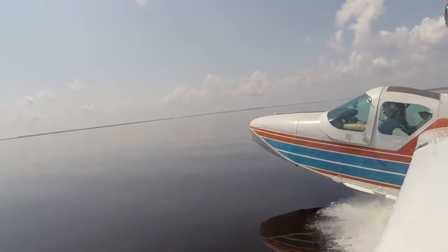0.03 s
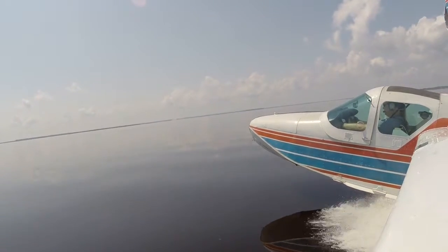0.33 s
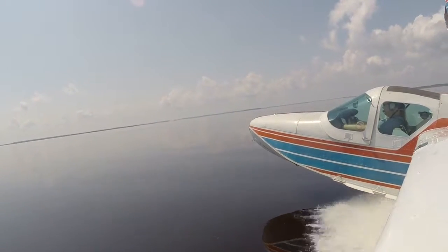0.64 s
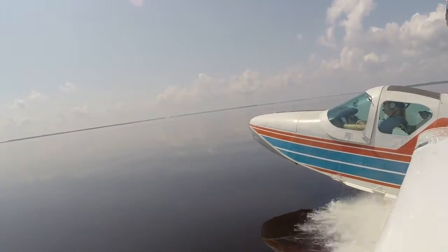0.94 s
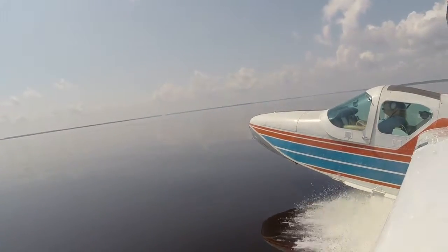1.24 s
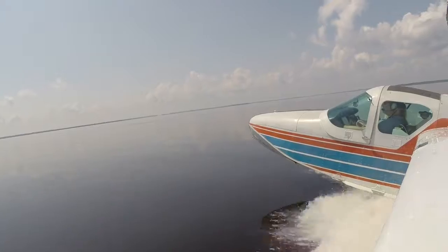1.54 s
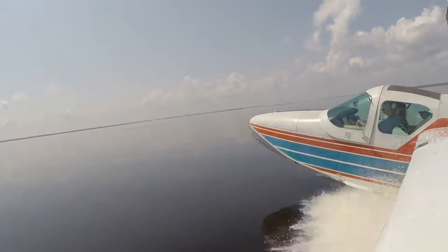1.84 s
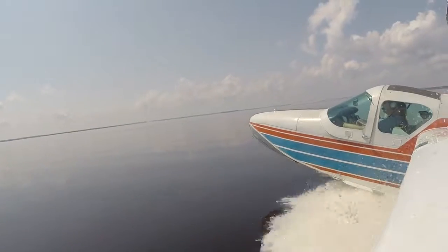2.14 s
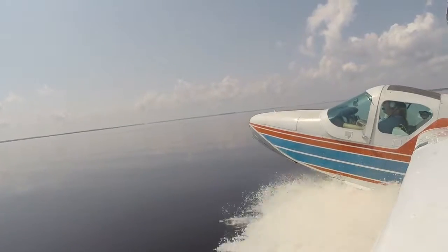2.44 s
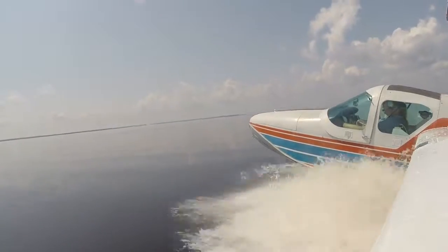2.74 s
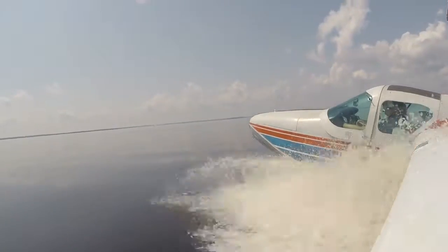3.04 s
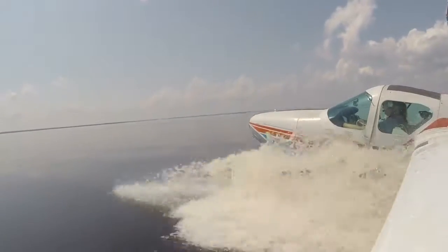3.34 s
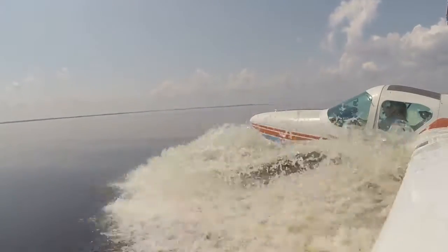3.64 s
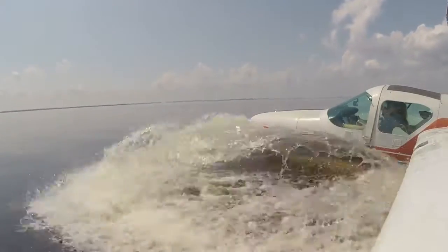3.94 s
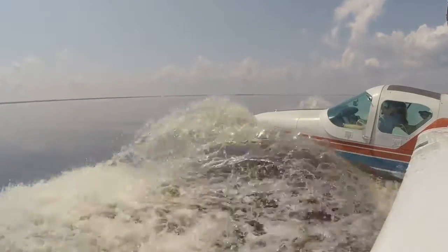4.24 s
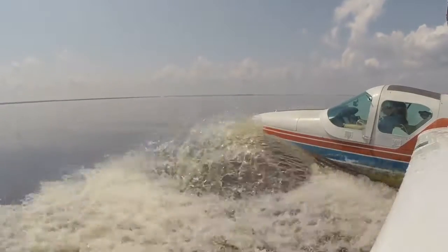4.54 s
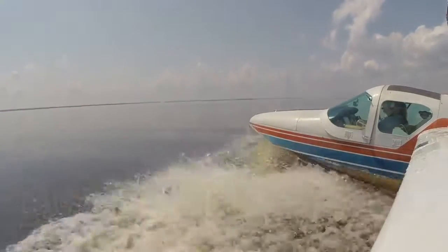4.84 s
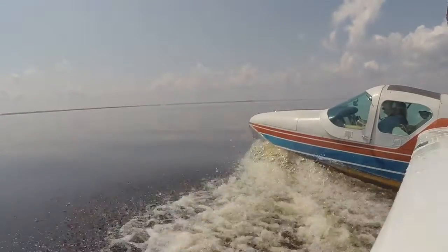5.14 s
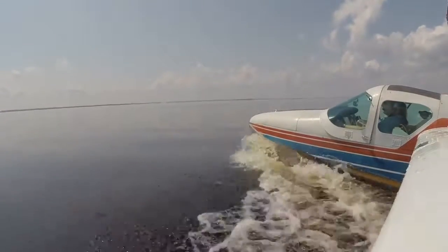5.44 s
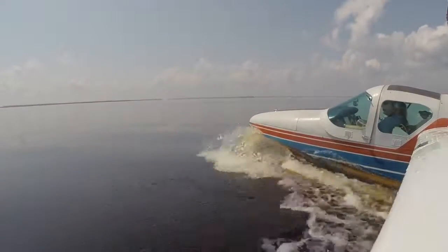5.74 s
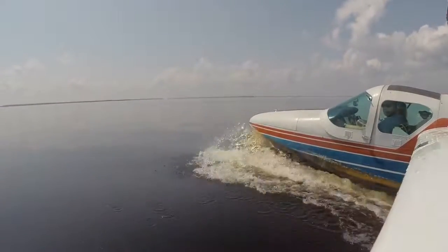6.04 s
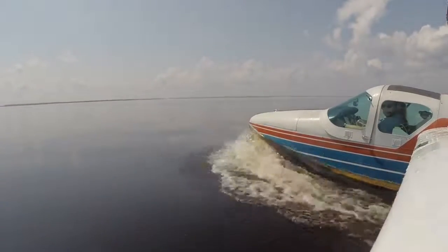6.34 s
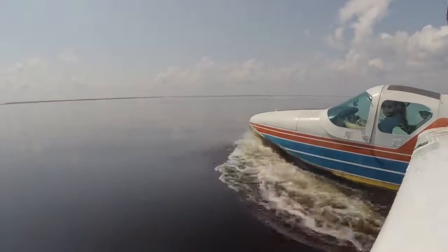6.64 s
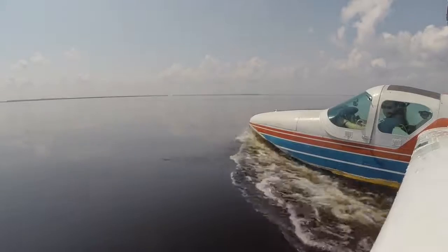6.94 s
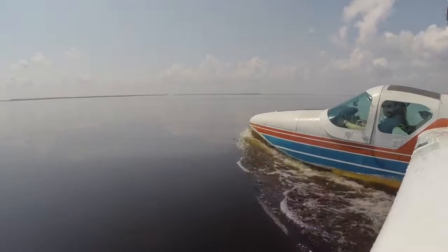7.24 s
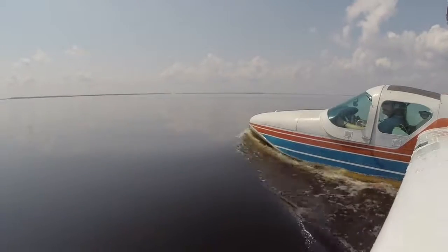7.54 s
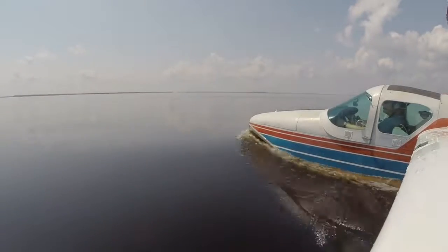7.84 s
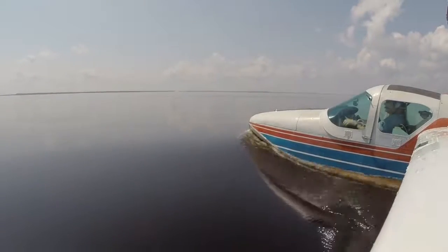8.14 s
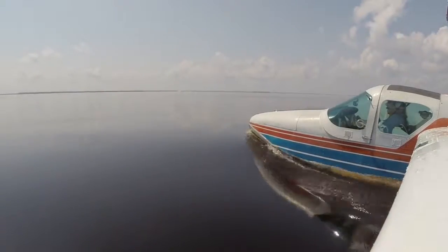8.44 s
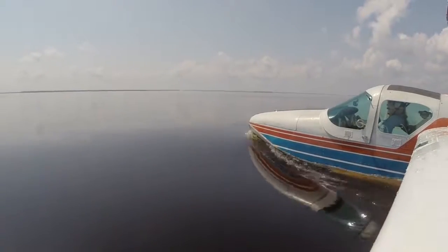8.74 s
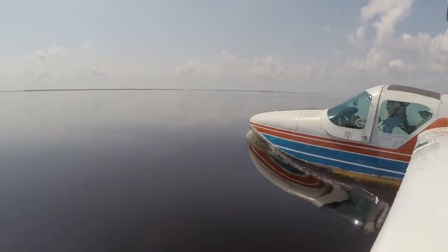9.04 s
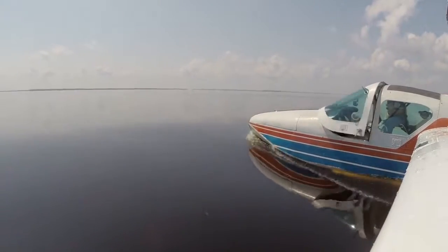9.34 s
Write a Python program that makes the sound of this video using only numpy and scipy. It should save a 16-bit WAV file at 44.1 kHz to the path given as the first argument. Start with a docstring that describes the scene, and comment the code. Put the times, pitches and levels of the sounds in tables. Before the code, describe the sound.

A small seaplane rumbles and hisses across water, spray washing up, then drifts with its engine idling, a part ticking and wavelets knocking.

```python
"""The airframe of a small flying boat rumbles as it skims onto calm water, ploughs to a stop and drifts.
Water pounding the hull drives the resonances of wing, panels and cavity; the keel hisses, the bow throws
spray, and wavelets knock on the floating hull. The engine hums at idle and a loose part ticks with it.
All is heard from a camera in a closed housing on the wing. Drops strike the housing and make it ring;
each hard one ducks the camera's gain, which then creeps back up."""
import sys
import numpy as np
from scipy import signal
from scipy.fft import rfft, irfft, next_fast_len
from scipy.io import wavfile
from scipy.ndimage import uniform_filter1d, minimum_filter1d, map_coordinates

SR = 44100
rng = np.random.default_rng(int(sys.argv[2]) if len(sys.argv) > 2 else 0)


def wav_out(sig):
    """Save sig, one row per channel (or a flat mono array), as 16-bit PCM at SR to the path in sys.argv[1]."""
    wavfile.write(sys.argv[1], SR, np.round(np.clip(np.atleast_2d(sig).T, -1, 1) * 32767).astype(np.int16))


N = 418068

# water pounding the hull, hard while it planes, light once it floats: (time [s], level [dB])
HULL_LOAD = [(0, -16), (.4, -19), (.7, -14.5), (1.0, -11), (1.6, -13.5), (3.1, -15), (3.55, -23.5),
             (4.5, -25), (7.8, -26.5), (9.48, -27)]
# waves passing under the floating hull: (time [s], length [s], wing boost [dB])
SWELLS = [(3.818, .2, 5), (5.58, 0.22, 6.5), (6.77, 0.35, 6.5), (7.3, 0.1, 7.5), (8.74, 0.17, 5.5)]
# airframe and airflow spectra: (frequency [Hz], relative level [dB])
WING_SPECTRUM = [(85, -20), (112, -14.5), (130, -5.5), (143, 0.5), (156, -6), (180, -11), (205, -22.5)]
PANEL_SPECTRUM = [(160, -12), (205, -2), (230, -1.5), (247, -1.5), (285, 1), (310, -11), (340, -19),
                  (367, -11), (385, -20.5), (460, -27)]
CAVITY_SPECTRUM = [(480, -21), (620, 2), (740, 2.5), (815, -11.5), (890, 4), (1000, -16)]
SLIPSTREAM_SPECTRUM = [(25, 9), (34, -13.5), (50, 0.5), (70, -2.5), (95, 1), (130, -3)]
# drops on the housing: (time [s], snap peak [dB], splat level [dB])
DROPS = [(.4235, 4, -8), (.7203, 14.5, -8), (.8635, 3, -14), (1.006, -1, -19), (1.034, 3, -4),
         (1.2, 5, -12), (1.2215, -3, -15), (1.2545, 1, -7), (2.1898, 12.5, -16), (2.5295, -1, -9.5)]
# the housing's modes: (frequency [Hz], relative level [dB], t60 [s])
HOUSING_MODES = [(698, -15.5, 0.05), (1200, -5, 0.046), (1783, -4, 0.04), (1990, 1, 0.015),
                 (2296, 4.5, 0.019), (2475, 14.5, 0.0088), (3140, -2, 0.013)]
# engine harmonics: (multiple of the pulse rate, mean level [dB])
HUM_HARMONICS = [(1, -31.5), (2, -43), (3, -61.5), (4, -56), (5, -56.5), (6, -63), (8, -59.5)]
# engine noise spectra: (frequency [Hz], relative level [dB])
MACHINERY_SPECTRUM = [(400, -0.5), (520, -10), (630, -4.5), (750, -3.5), (815, -5), (880, 3), (970, -5),
                      (1080, -12.5), (1230, -2), (1620, -9.5), (1880, -3), (2700, -7), (3600, -14),
                      (5100, -23), (8500, -44), (14500, -54.5)]
WHINE_SPECTRUM = [(1950, -23), (2120, 12), (2200, 13), (2420, -15)]
# hiss of the planing keel: (time [s], level [dB])
KEEL_LEVEL = [(0, -19), (.2, -19.5), (.4, -17), (.5, -22.5), (1.1, -24.5), (1.95, -30), (2.25, -44.5),
              (2.8, -42.5)]
# water thrown up by the bow: (time [s], level [dB])
SPRAY_LEVEL = [(1.5, -45.5), (2.3, -38), (3.25, -35.5), (3.7, -37), (4.5, -35.5), (5.55, -47),
               (6.15, -43.5), (6.7, -51), (8, -65)]
# the rattle's cycle, lengthening as the engine settles: (time [s], period [s])
RATTLE_PERIOD = [(2.7, .2196), (5.3, .2381), (6.2, .2324), (7.9, .2347), (9.0, .2279)]
# contacts in each cycle: (phase [cycles], level re the main tick [dB])
CONTACTS = [(0, 0), (.25, -23), (.75, -11.5)]
# the loose part's modes: (frequency [Hz], width [Hz], relative level [dB])
RATTLE_MODES = [(1900, 280, 8), (2550, 400, -3), (3290, 480, 9.5), (4400, 500, -8), (5720, 560, 1.5),
                (7080, 340, -1.5), (8000, 1000, -6.5), (8850, 400, -13.5), (10600, 1000, -23),
                (12700, 1100, -25)]
# the strongest wavelets on the hull: (time [s], excitation level [dB])
SLAPS = [(5.965, -31), (6.43, -31), (6.868, -25.5), (6.897, -28.5), (7.138, -33), (7.332, -28.5),
         (7.597, -34), (8.036, -28), (8.498, -28), (8.992, -32)]
# spectra of the water sounds: (frequency [Hz], relative level [dB])
SPLAT_SPECTRUM = [(80, -2), (150, 7), (430, -12), (690, 3), (950, -10), (1800, -6), (2250, 1), (3000, -13),
                  (4200, -29), (8000, -45)]
KEEL_SPECTRUM = [(600, -23.5), (950, -10), (1230, 8.5), (1450, -3.5), (1800, -1.5), (2050, -6.5),
                 (3200, -0.5), (3700, -6.5), (4200, -16.5), (5100, -17), (5600, -16), (6200, -26.5),
                 (7000, -22), (7700, -32.5), (11000, -40), (15000, -58)]
WASH_SPECTRUM = [(400, -6), (700, -3.5), (1050, -3), (1800, 0.5), (2250, 6.5), (2800, -1), (3500, 0.5),
                 (4050, -6), (4500, -2), (5100, -13.5), (5650, -7.5), (7500, -21)]
MIST_SPECTRUM = [(6200, 4), (7400, 1), (8550, 8.5), (10000, -1.5), (13000, -6), (15000, -12.5)]
SLOSH_SPECTRUM = [(700, -16), (1300, -5), (1850, -2), (2600, -0.5), (3500, -6), (5000, -20.5), (8500, -27)]
KNOCK_SPECTRUM = [(90, -9), (150, 7.5), (230, -10.5), (350, -6.5), (520, -1), (620, 1), (740, 8.5),
                  (815, -11), (900, 2), (1150, -9.5), (2300, -14.5), (4000, -39)]


def airframe(boom_db=-1.25, panel_db=-9, cavity_db=-26.5, air_db=-36.0, air_speed_db=7.5, stop_s=4.9):
    """Forced vibration: one water load drives wing, panels and cavity; air rumble eases as speed falls."""
    t, load_db = seconds(), curve(HULL_LOAD)
    swell_db = sum(db * np.exp(-(2 * (t - s) / length) ** 2) for s, length, db in SWELLS)
    speed = np.clip(1 - t / stop_s, 0, 1)
    wing = amp(boom_db + swell_db) * drone(WING_SPECTRUM, hold_s=0.15)
    panels = amp(panel_db) * drone(PANEL_SPECTRUM, hold_s=0.5)
    pounding = unit(noise() + grains(rate=70, spread_db=15.0))
    cavity = amp(cavity_db) * coloured(pounding, CAVITY_SPECTRUM)
    air = amp(air_db + air_speed_db * speed) * coloured(noise(), SLIPSTREAM_SPECTRUM)
    return amp(load_db) * (wing + panels + cavity) + air


def drops(attack_s=0.00036, crack_db=-42):
    """Impact excitation: each drop rings the housing's damped modes, then spreads in a wet splat."""
    snaps, t = np.zeros(N), np.arange(SR // 10) / SR
    ring = sum(amp(db - 60 * t / t60) * np.sin(2 * np.pi * hz * t) for hz, db, t60 in HOUSING_MODES)
    ring *= 1 - np.exp(-(t / attack_s) ** 2)  # water makes a soft contact
    for s, db, _ in DROPS:
        add(snaps, s, amp(db) * ring / np.abs(ring).max())
    crack = bursts([(s, db + crack_db) for s, db, _ in DROPS], rise_s=.0002, t60=.007)
    splat = bursts([(s, db) for s, _, db in DROPS], rise_s=.002, t60=.09)
    return snaps + crack + coloured(splat, SPLAT_SPECTRUM)


def engine(pulse_hz=122.74, low_throb_hz=34, low_throb_db=-38.5, machinery_db=-44.5, whine_db=-45.5,
           throb_depth=0.12):
    """Periodic pulses give a harmonic hum; a deep, wavering throb pulses machine noise under a whine."""
    clock = np.cumsum(1 + 0.002966 * wobble(1.5) + 0.00618 * wobble(17)) / SR  # the speed wavers
    hum = sum(amp(db + 3.3 * wobble(3.7)) * np.sin(2 * np.pi * order * pulse_hz * clock)
              for order, db in HUM_HARMONICS)
    low_throb = np.sin(2 * np.pi * low_throb_hz * clock + 0.87 * wobble(7))
    tones = np.sqrt(2) * (hum + amp(low_throb_db + 7.1 * wobble(7)) * low_throb)
    machinery = amp(machinery_db) * coloured(noise(), MACHINERY_SPECTRUM) * (1 + throb_depth * low_throb)
    whine = amp(whine_db) * drone(WHINE_SPECTRUM, hold_s=0.085)
    return tones + machinery + whine


def keel_hiss(flutter_db=-0.72, fade_db_per_s=40):
    """Shear noise: the keel cuts the surface with a hiss that dies as the hull comes off the step."""
    off_step_s = np.maximum(seconds() - KEEL_LEVEL[-1][0], 0)
    level_db = curve(KEEL_LEVEL) - fade_db_per_s * off_step_s + flutter_db * wobble(26.1)
    return amp(level_db) * coloured(patchy(noise(), depth_db=1.0), KEEL_SPECTRUM)


def spray(mist_db=-57, mist_exponent=1.37, reference_db=-38, fizz_db=-76, droplets=0.36):
    """Random impacts: bow spray rains back as a wash; mist follows a power law, over a steady fizz."""
    spray_db = curve(SPRAY_LEVEL)
    water = unit(noise() + droplets * grains(rate=500, spread_db=24))
    wash = amp(spray_db + 0.73 * wobble(13)) * coloured(patchy(water, depth_db=1.5), WASH_SPECTRUM)
    mist = amp(mist_db + mist_exponent * (spray_db - reference_db))
    return wash + np.hypot(mist, amp(fizz_db)) * coloured(noise(), MIST_SPECTRUM)


def rattle(tick_db=-30.5, growth_db_per_s=.42, scatter_db=1.0, rub_db=-15, reference_tick_s=2.3665):
    """Intermittent contact: a loose part rocks with the engine, in cycles of tick, rebound, rub, rebound."""
    t = seconds()
    turns = np.cumsum(1 / curve(RATTLE_PERIOD)) / SR
    turns -= np.interp(reference_tick_s, t, turns)
    cycles = np.arange(int(turns[-1]) + 1)  # the first tick falls at reference_tick_s
    times_at = lambda phase: np.interp(cycles + phase, turns, t)
    level_db = tick_db + growth_db_per_s * (times_at(0) - reference_tick_s)
    level_db += scatter_db * rng.standard_normal(len(cycles))
    contacts = np.vstack([np.c_[times_at(phase), level_db + db] for phase, db in CONTACTS])
    resonances = lambda f: unit(sum(amp(db) * (1j * f * width / (hz * hz - f * f + 1j * f * width)) ** 2
                                    for hz, width, db in RATTLE_MODES))
    ticks = filtered(bursts(contacts, rise_s=.0042, t60=.03), resonances)
    rubs = bursts(np.c_[times_at(.5), level_db + rub_db], rise_s=0.0087, t60=0.16)
    return ticks + coloured(rubs, SLOSH_SPECTRUM)


def lapping(ripple_db=-49, slosh_db=-51, slosh_swing_db=7):
    """Cavity resonance: wavelets and ripples knock on the hollow hull, with sloshes between them."""
    knocks = bursts(SLAPS, rise_s=.003, t60=.04)
    ripples = amp(ripple_db) * grains(rate=30, spread_db=18.5)
    surge = amp(slosh_swing_db * np.clip(wobble(24), -2, 2))
    sloshes = amp(slosh_db) * unit(surge * coloured(noise(), SLOSH_SPECTRUM))
    return sloshes + coloured(knocks + ripples, KNOCK_SPECTRUM)


def amp(db):
    """Decibels to amplitude ratio."""
    return 10 ** (np.asarray(db) / 20)


def unit(x):
    """Normalisation to rms 1."""
    return x / np.sqrt(np.mean(np.abs(x) ** 2) + 1e-20)


def seconds():
    """The time of every sample."""
    return np.arange(N) / SR


def curve(rows):
    """Linear interpolation of (time [s], value) rows at every sample."""
    return np.interp(seconds(), *np.transpose(rows))


def noise():
    """White noise of rms 1."""
    return rng.standard_normal(N)


def wobble(rate):
    """Random modulation: a smooth curve through rate knots a second."""
    knots = rng.standard_normal(int(N * rate / SR) + 4)
    coarse = np.arange(0, N, 32)
    return np.interp(np.arange(N), coarse, map_coordinates(knots, [coarse * rate / SR]))


def filtered(x, response):
    """Linear filtering by a complex frequency response."""
    size = 2 * next_fast_len(N // 2 + SR // 4)
    return irfft(rfft(x, size) * response(np.fft.rfftfreq(size, 1 / SR)), size)[:N]


def coloured(x, spectrum, size=8192):
    """Minimum-phase filter of unit power, shaped like the spectrum and falling steeply past its ends."""
    hz, db = np.transpose(spectrum)
    hz, db = np.r_[hz[0] / 2, hz, hz[-1] * 2], np.r_[db[0] - 40, db, db[-1] - 60]
    level_db = np.interp(np.log(np.fft.rfftfreq(size, 1 / SR) + 1), np.log(hz), db)
    cepstrum = irfft(np.log(unit(amp(level_db))))
    cepstrum[1:size // 2] *= 2  # folding makes the filter causal
    cepstrum[size // 2 + 1:] = 0
    return signal.oaconvolve(x, irfft(np.exp(rfft(cepstrum))))[:N]


def drone(spectrum, hold_s):
    """Resonant noise that flutters quickly but keeps its mean power over hold_s."""
    x = unit(coloured(noise(), spectrum))
    power = np.abs(uniform_filter1d(x ** 2, size=round(hold_s * SR)))
    return x / np.sqrt(power + 1e-6)


def grains(rate, spread_db):
    """Shot noise: rate random impulses a second, of uneven size, rms 1."""
    where, size = rng.random((round(rate * N / SR), 2)).T
    height = amp(spread_db * size) * (-1) ** np.arange(len(size))
    return unit(np.bincount((where * N).astype(int), height, N))


def patchy(x, depth_db):
    """Random modulation: small patches of time and frequency swell and fade on their own."""
    spectra = signal.stft(x, nperseg=512)[2]
    field = uniform_filter1d(rng.standard_normal(spectra.shape), size=6, axis=0)
    field = unit(uniform_filter1d(field, size=7, axis=1))
    return unit(signal.istft(spectra * amp(depth_db * field))[1][:N])


def add(track, start_s, sound):
    """Superpose a sound on a track."""
    span = track[max(round(start_s * SR), 0):][:len(sound)]
    span += sound[:len(span)]


def bursts(rows, rise_s, t60):
    """A noise burst that rises and decays exponentially for each (time [s], level [dB])."""
    envelope, t = np.zeros(N), np.arange(SR // 5) / SR
    onset = np.minimum(t / rise_s, 1) ** 2
    for s, db in rows:
        add(envelope, s, onset * amp(db - 60 * np.maximum(t - rise_s, 0) / t60))
    return envelope * noise()


def scene():
    """Superposition of all sources at the one microphone in the housing."""
    return (engine() + airframe() + keel_hiss() + spray() + lapping() + rattle() + drops())[None]


def record(dry, recovery_db_per_s=11, top_hz=15300):
    """Automatic gain control ducks just ahead of a peak over full scale and recovers; a low-pass follows."""
    x, climb_db = dry[0], recovery_db_per_s * seconds()
    needed_db = -20 * np.log10(np.maximum(np.abs(x), 1))
    ahead_db = minimum_filter1d(needed_db, size=265)  # looks 3 ms ahead
    gain_db = np.minimum.accumulate(ahead_db - climb_db) + climb_db
    ducked = x * amp(uniform_filter1d(gain_db, size=65))
    return filtered(ducked, lambda hz: hz < top_hz)[None]


dry = scene()
out = record(dry)
wav_out(out)
```